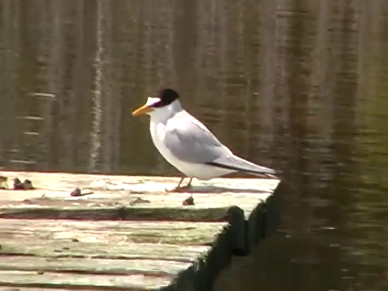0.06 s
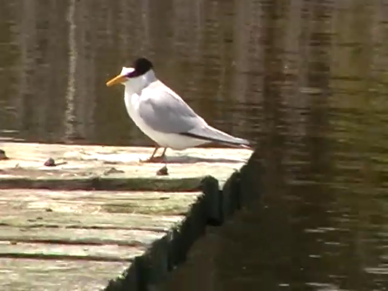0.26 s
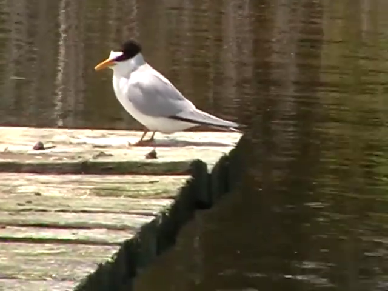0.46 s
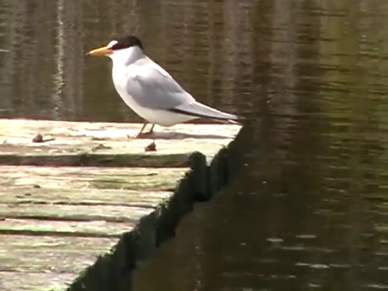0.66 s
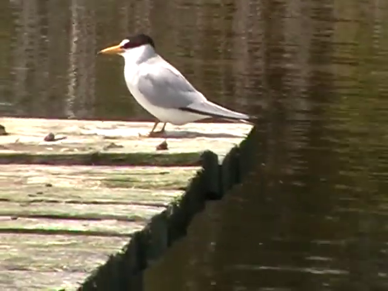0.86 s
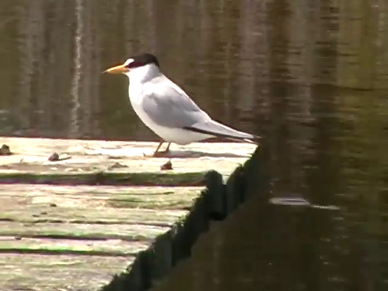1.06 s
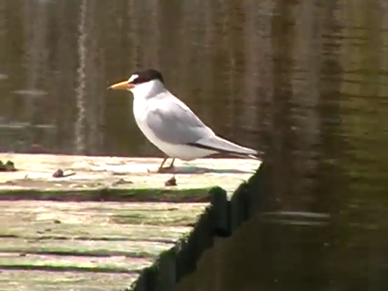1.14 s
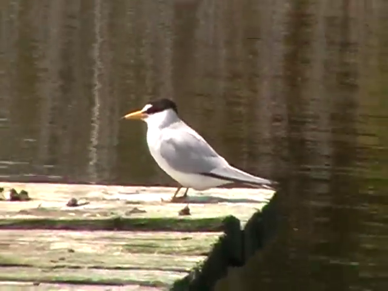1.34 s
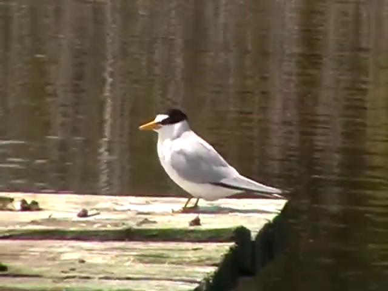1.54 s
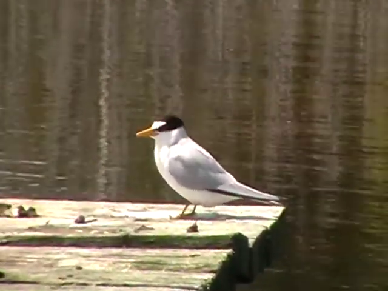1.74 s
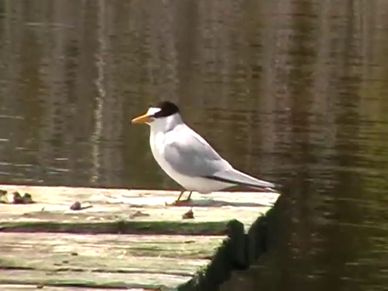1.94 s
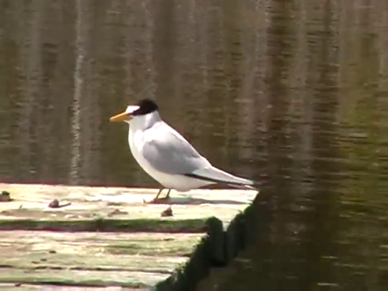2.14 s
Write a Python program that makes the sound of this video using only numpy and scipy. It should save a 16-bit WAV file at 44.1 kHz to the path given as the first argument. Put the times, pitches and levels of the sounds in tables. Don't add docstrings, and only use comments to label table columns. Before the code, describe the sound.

Outdoors beside still water, a near tern gives sharp climbing chirps, a rattling trill and downward slide, then spaced harsh chatter notes, with low distant traffic hum, small wind puffs and light ticks on a camera microphone.

```python
import sys
import numpy as np
from scipy import signal
from scipy.fft import rfft, irfft
from scipy.io import wavfile
from scipy.ndimage import uniform_filter1d

SR = 44100
rng = np.random.default_rng(int(sys.argv[2]) if len(sys.argv) > 2 else 0)


def to_linear_factor(level_db):
    exponent = np.asarray(level_db, float) / 20
    return 10 ** exponent


def inscribe(sig):
    pcm = np.round(np.clip(np.atleast_2d(sig).T, -1, 1) * 32767)
    wavfile.write(sys.argv[1], SR, pcm.astype(np.int16))


N = 97020

WHISTLE_HARMONICS = [0, -16, -9]
# [f/Hz, level/dB]
MIC_RESPONSE = [(8500, 4), (10000, -4.5), (12000, -30), (14000, -27), (16000, -41)]


def evened(x):
    return x / np.sqrt(np.mean(x ** 2) + 1e-20)


def coloured(x, points):
    f, db = np.transpose(points)
    hz = np.fft.rfftfreq(len(x), 1 / SR)
    gain = to_linear_factor(np.interp(np.log(hz + 1), np.log(f + 1), db))
    return irfft(rfft(x) * gain, len(x))


def resonate(x, hz, width_hz):
    turn = np.exp(2j * np.pi * np.cumsum(hz * np.ones(len(x))) / SR)
    r = np.exp(-np.pi * width_hz / SR)
    return 2 * (turn * signal.lfilter([(1 - r) ** 2], [1, -2 * r, r * r], x / turn)).real


def add(mix, s, sound):
    part = mix[round(s * SR):][:len(sound)]
    part += sound[:len(part)]


def drift(count, size):
    noise = rng.standard_normal(count + 400)
    smooth = uniform_filter1d(uniform_filter1d(noise, size), size)
    return evened(smooth)[200:count + 200]


def tone(hz, levels_db):
    phase = 2 * np.pi * np.cumsum(hz) / SR
    return sum(np.sqrt(2) * to_linear_factor(db) * np.sin(k * phase) * (k * hz < .45 * SR)
               for k, db in enumerate(levels_db, 1))


def gate(t, length, rise, fall):
    return np.clip(np.minimum(t / rise, (length - t) / fall), 0, 1)


def crack(hz):
    length, first, last = 0.014, 1.65, 0.5
    u = np.arange(0, length, 1 / SR) / length
    level = np.sin(np.pi * u) * (1 + 1.88 * drift(len(u), size=12))
    return level * tone(hz * first * (last / first) ** u, [0, -8])


def chirp(mix, start, length, db, first_hz, last_hz):
    fray_s, pure_db = .035, -23.5
    t = np.arange(0, length, 1 / SR)
    u = t / length
    fray = np.minimum(t / fray_s, 1) ** 2
    scoop = 1 - 0.133 * np.exp(-t / 0.00358)
    flutter = 1 + 0.017 * fray * to_linear_factor(-db - 34).clip(.15, 1) * drift(len(t), size=50)
    ripple = 0.029 * to_linear_factor(pure_db - db).clip(.1, 1) * np.sin(2 * np.pi * 224 * t)
    hz = (first_hz + (last_hz - first_hz) * u ** 1.5) * scoop * flutter
    hz = hz * (1 + 0.0233 * np.sin(np.pi * u) + ripple)
    loss_db = 1.1 * max(db - pure_db, 0) * np.sign(np.arange(len(WHISTLE_HARMONICS)))
    wobble = 1 + 0.39 * (0.18 + fray) * to_linear_factor(-db - 15).clip(.2, 1) * drift(len(t), size=70)
    level = gate(t, length, 0.0084, 0.0016) * to_linear_factor(db + 3 * (u - 2.5)) * wobble
    add(mix, start, level * tone(hz, WHISTLE_HARMONICS - loss_db))
    crack_level = to_linear_factor(min(db, -28) - 17) * min(length / fray_s, 1) ** 2
    add(mix, start + length + 0.00101, crack_level * crack(last_hz))


def trill(mix, rows):
    s, *cols = np.transpose(rows)
    t = np.arange(s[0], s[-1], 1 / SR)
    rate, high_hz, high_db, low_db = (np.interp(t, s, c) for c in cols)
    turns = np.cumsum(rate * (1 + .01 * drift(len(t), size=300))) / SR
    u = turns % 1
    low_share = np.interp(rate, [60, 65], [.3, 0.8])
    low = np.clip(u / low_share, 0, 1)
    high = np.clip((u - low_share) / (1 - low_share), 0, 1)

    floor_hz = 3065 - 397.4 * (t - s[0]) / (s[-1] - s[0])
    low_hz = floor_hz + (high_hz - floor_hz) * np.exp(-(low / .17) ** 1.42)
    low_level = to_linear_factor(low_db) * np.sin(np.pi * low ** 0.97).clip(0) ** 0.047
    high_level = to_linear_factor(high_db) * np.sin(np.pi * high).clip(0) ** 0.19
    scooped_hz = high_hz * (1 - 0.018 * np.exp(-high / 0.16))
    voice = low_level * tone(low_hz, [0, -26, -22]) + high_level * tone(scooped_hz, WHISTLE_HARMONICS)

    breath = [(2000, -14), (4000, 0), (6000, -4), (8500, 13.5), (10500, 4), (14000, 1), (16000, 6)]
    rasp = evened(coloured(rng.standard_normal(len(t)), breath))
    rasp_level = to_linear_factor(np.maximum(low_db, high_db - 3.5) - 16) * (0.27 + np.exp(-u / 0.62))
    add(mix, s[0], voice * (1 + 0.25 * drift(len(t), size=50)) + rasp * rasp_level)
    for i in np.flatnonzero(np.diff(u) < 0):
        add(mix, t[i] - .004, to_linear_factor(min(high_db[i], -30) - 15.5) * crack(high_hz[i]))


def slide(mix):
    # [t/s, f/Hz, level/dB]
    glide = [(.922, 4180, -57), (0.937, 3750, -32.5), (.952, 3080, -23.5), (0.981, 2260, -31),
             (0.999, 1913, -35), (1.02, 1520, -51)]
    harmonics = [2, -7.5, -12, -5, -8, -12]
    # [f/Hz, level/dB]
    throat_response = [(3000, 2), (4200, 7.5), (6500, -20.5), (9000, -9.5), (12000, -8.5)]
    second_ratio, second_db = .93, -1
    s, hz, db = np.transpose(glide)
    t = np.arange(s[0], s[-1], 1 / SR)
    f = np.interp(t, s, hz)
    upper = tone(f / np.sqrt(second_ratio), harmonics)
    lower = to_linear_factor(second_db) * tone(f * np.sqrt(second_ratio), harmonics)
    add(mix, s[0], to_linear_factor(np.interp(t, s, db) - 10.0) * coloured(upper + lower, throat_response))


def chatter(mix, start, whistle_s, whistle_db, rasp_s, rasp_db, top_hz, rough, throat_hz, beak_db, air_db):
    # [f/Hz, level/dB]
    diffuse_response = [(590, -60), (1000, -20), (1500, -34), (2520, -2), (2890, 8), (3770, 11.5), (9580, -8),
                        (12200, -51), (15700, -24)]
    # [f/Hz, width/Hz, level/dB]
    side_rings = [(5100, 1830, -2), (9700, 7300, -8), (1910, 2300, -6), (15400, 1700, 7.5)]
    t = np.arange(0, whistle_s, 1 / SR)
    arch = np.sin(np.pi * (t / whistle_s) ** 0.9).clip(0) ** 0.6
    low_hz = 2536
    hz = (low_hz + (top_hz - low_hz) * arch) * (1 + 0.081 * rough * drift(len(t), size=20))
    loud = .4 + 0.7 * np.exp(-((hz - 3750) / 120) ** 2)
    loud = loud * (1 + 1.7 * rough * drift(len(t), size=30))
    level = to_linear_factor(whistle_db) * gate(t, whistle_s, 0.0026 + 0.01 * rough, 0.001) * loud
    add(mix, start, level * tone(hz, [0, -30]))

    lead_s = .017
    t = np.arange(0, rasp_s + lead_s, 1 / SR)
    u = t / t[-1]
    hz = 2350 * .4 ** u * (1 + .06 * u * drift(len(t), size=25))
    voice = tone(hz, np.zeros(16)) + u * tone(hz / 2, np.zeros(24))
    noise = np.maximum(.55 * np.minimum(.3 + 2 * u, 1), .8 * rough)
    drive = (1 - noise) * evened(voice) + noise * rng.standard_normal(len(t))
    drive = drive * to_linear_factor(2.2 * drift(len(t), size=60))
    sink = 1 + 0.094 * (.5 - u)
    throat = resonate(drive, throat_hz, 1530)
    for (f, width_hz, db), own_db in zip(side_rings, (beak_db, .5 * air_db, 0, air_db)):
        throat = throat + to_linear_factor(db + own_db) * resonate(drive, f * sink, width_hz)
    sound = evened(throat) + to_linear_factor(-3.5) * evened(coloured(drive, diffuse_response))
    shape = np.clip(t / .019, 0, 1) ** 1.2 * to_linear_factor(-18 * u ** 2.0) * gate(t, t[-1], .001, .018)
    add(mix, start + whistle_s - lead_s, to_linear_factor(rasp_db) * shape * evened(sound))


def seabird(mix):
    # [t/s, length/s, level/dB, first f/Hz, last f/Hz]
    chirps = [(0.018, 0.029, -40, 3950, 4740), (0.102, .046, -36, 4060, 4570),
              (0.192, 0.028, -29, 4030, 4135), (0.211, 0.04, -36, 4380, 4500),
              (0.298, 0.052, -31.5, 4080, 4756), (0.405, .043, -23.5, 4560, 4810),
              (0.517, 0.034, -15.5, 4930, 4872), (0.672, .024, -18.5, 4910, 4970)]
    # [t/s, beat rate/Hz, high f/Hz, high level/dB, low level/dB]
    trills = [
        [(.551, 54, 4840, -25, -35), (.566, 53, 4625, -33.5, -43), (.576, 74, 4640, -36.5, -46),
         (.604, 62, 4136, -32.5, -44), (.622, 50, 4200, -61, -37)],
        [(.697, 56.5, 4820, -23, -29.5), (.728, 59, 4633, -26, -42.5), (.745, 68, 4577, -30, -33.5),
         (.762, 70, 4100, -39, -29), (.81, 71.4, 3846, -36, -30), (.857, 69, 3730, -40, -33),
         (.89, 112, 3590, -42.5, -36.5), (.92, 160, 3500, -58, -49)],
    ]
    # [t/s, whistle length/s, whistle level/dB, rasp length/s, rasp level/dB]
    calls = [(1.032, .018, -22.5, .042, -23), (1.132, .021, -24, .038, -26.5),
             (1.245, .024, -25.5, .038, -24), (1.375, .025, -23, .038, -21.5),
             (1.509, .025, -22.5, .045, -23.5), (1.674, .02, -32, .04, -24), (1.864, .03, -33, .028, -28.5)]
    # [arch top f/Hz, roughness 0-1, throat f/Hz, beak level/dB, air level/dB]
    colours = [(3950, .2, 3700, 3, -4), (4170, .2, 3800, -1, -1), (4100, .25, 3500, -3, -1),
               (4250, .2, 3600, -3, -2), (4120, .2, 3800, -3, -1), (4050, .7, 3800, -5, -13),
               (4000, .7, 4150, -5, -11)]
    for row in chirps:
        chirp(mix, *row)
    for rows in trills:
        trill(mix, rows)
    slide(mix)
    for row, colour in zip(calls, colours):
        chatter(mix, *row, *colour)


def far_birds(mix):
    # [t/s, length/s, level/dB, first f/Hz, last f/Hz]
    whistles = [(1.0, .036, -41, 2400, 2150), (1.43, .05, -49, 2900, 3150), (1.715, .064, -53, 3050, 2930),
                (1.772, .03, -52, 2930, 3400), (2.015, .05, -49, 1800, 1780), (2.042, .03, -49, 2750, 3150),
                (2.07, .065, -50, 3200, 2800), (1.322, .03, -61, 7300, 5600), (.62, .08, -49, 3000, 2650),
                (1.47, .03, -50, 3500, 3650)]
    throbs = [82, -3.5, 0.5, 0, -3, 95, 96, 5, 103.5, 127]
    for (start, length, db, first_hz, last_hz), beats in zip(whistles, throbs):
        t = np.arange(0, length, 1 / SR)
        hz = first_hz + (last_hz - first_hz) * t / length
        throb = 1 + .85 * np.sin(2 * np.pi * beats * t)
        add(mix, start, to_linear_factor(db) * gate(t, length, .008, .008) * throb * tone(hz, [0, -30]))


def banks(x):
    t60_s = 0.29
    t = np.arange(SR // 2) / SR
    tail = rng.standard_normal(len(t)) * to_linear_factor(-60 * t / t60_s) * (t > .004)
    return signal.fftconvolve(x, tail / np.linalg.norm(tail))[:N]


def handling():
    # [t/s, peak level/dB]
    ticks = [(0.0835, -40), (0.187, -33), (0.219, -24), (0.2602, -19.5), (0.294, -30), (0.3575, -36),
             (0.6265, -36), (1.198, -34), (2.142, -43)]
    # [t/s, length/s, level/dB]
    rustles = [(.08, .04, -47), (.185, .08, -49), (.27, .1, -52), (.55, .08, -46)]
    # [t/s, length/s, level/dB, f/Hz]
    puffs = [(0.059, 0.045, -39, 90), (0.164, 0.062, -38.5, 169), (0.81, 0.088, -36.5, 112),
             (0.881, 0.05, -41, 130), (0.953, 0.035, -37, 184), (0.569, 0.039, -52, 150),
             (1.505, 0.039, -35.5, 175)]
    mix, t = np.zeros(N), np.arange(300) / SR
    for s, db in ticks:
        add(mix, s, to_linear_factor(db) * np.exp(-t / 0.00016) * np.diff(rng.standard_normal(301)))
    for s, length, db in rustles:
        count = round(length * SR)
        grit = np.diff(rng.standard_normal(count + 1)) * to_linear_factor(7.7 * drift(count, size=60))
        add(mix, s, to_linear_factor(db) * np.hanning(count) * grit)
    mix = coloured(mix, MIC_RESPONSE)
    for s, length, db, hz in puffs:
        u = np.arange(0, 1, 1 / (length * SR))
        spectrum = [(20, -14), (hz, 0), (3 * hz, -12), (1200, -50)]
        noise = coloured(rng.standard_normal(4096), spectrum)
        add(mix, s, to_linear_factor(db) * np.sin(np.pi * u ** 0.5) ** 2 * evened(noise[:len(u)]))
    return mix


def outdoor_hum():
    # [f/Hz, level/dB]
    hum_spectrum = [(15, -47), (25, -1.5), (480, -1), (636, 5), (800, 0.5), (1060, 3.5), (2510, -7),
                    (4090, -12), (15700, -46.5)]
    hum = coloured(rng.standard_normal(N), hum_spectrum)
    hum = to_linear_factor(-39.5) * evened(coloured(hum, [(25, -13.5), (80, 5.5), (200, 3.5)]))
    low = coloured(hum, [(150, 4), (400, -30)])
    return hum * to_linear_factor(.6 * drift(N, size=5000)) + low * (to_linear_factor(1.5 * drift(N, size=1200)) - 1)


def scene():
    # [t/s, share toward the left]
    bearing = [(.2, 0.062), (.45, 0.045), (.75, 0.032), (.95, 0.024), (2.2, 0.032)]
    bird = np.zeros(N)
    seabird(bird)
    far_birds(bird)
    bird = coloured(bird + to_linear_factor(-11.5) * banks(bird), MIC_RESPONSE)
    ground = outdoor_hum()
    side = to_linear_factor(-7) * coloured(banks(bird), [(1800, -40), (3000, -41.0), (5000, -41), (12000, -22)])
    side = side + coloured(np.roll(ground, N // 2), [(150, -27.5), (350, -33.5), (600, -40.5), (900, -80.5)])
    side = side + bird * np.interp(np.arange(N) / SR, *np.transpose(bearing))
    mid = bird + ground + handling()
    return np.array([mid + side, mid - side])


def top_cut(x):
    return signal.sosfilt(signal.butter(12, 15880, fs=SR, output="sos"), x)


def record(dry):
    low_pass = signal.firwin(511, 15850, window=("kaiser", 9), fs=SR)
    cut = signal.oaconvolve(dry, low_pass[None], "same")
    return top_cut(cut + to_linear_factor(-86) * dry)


dry = scene()
out = record(dry)
inscribe(out)
```